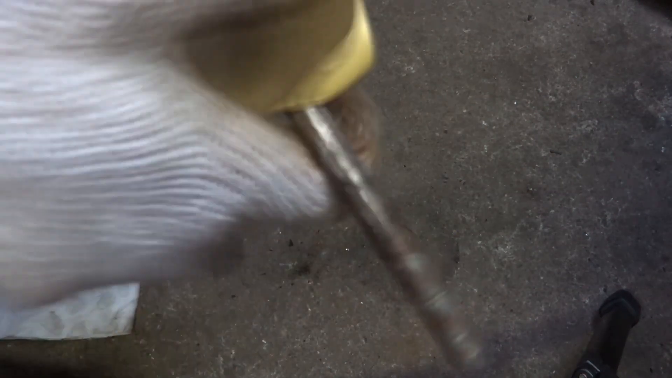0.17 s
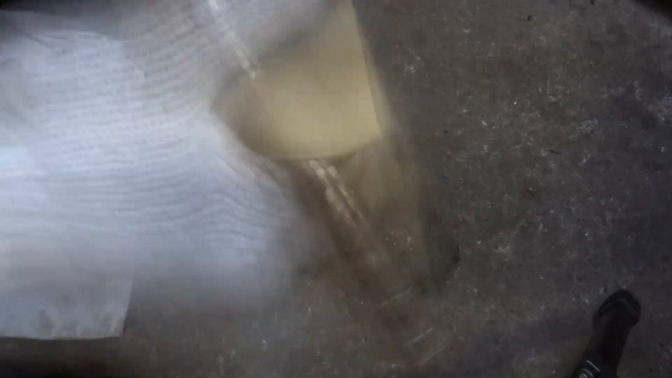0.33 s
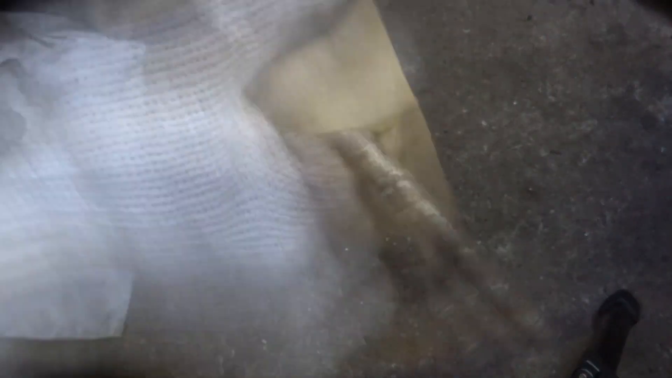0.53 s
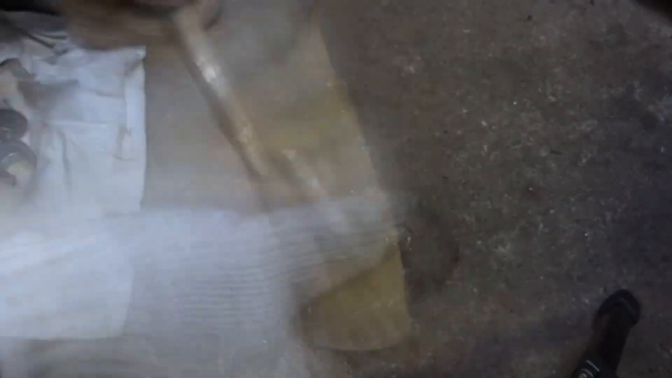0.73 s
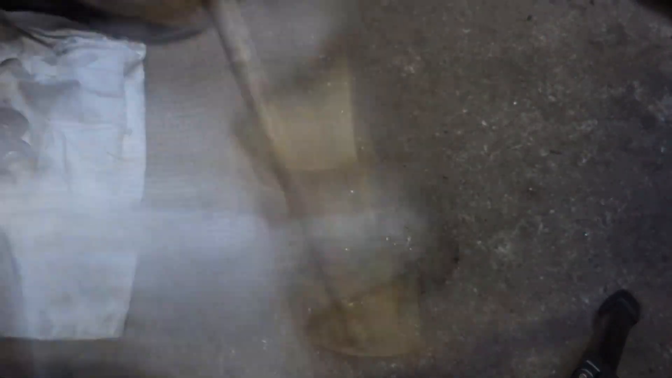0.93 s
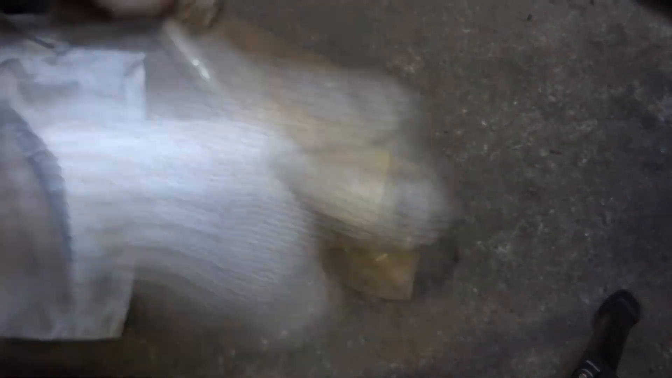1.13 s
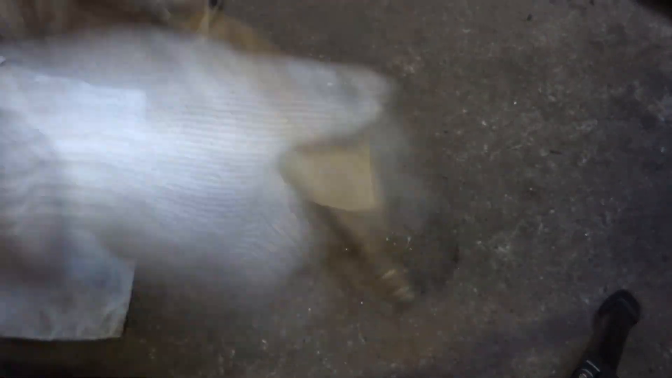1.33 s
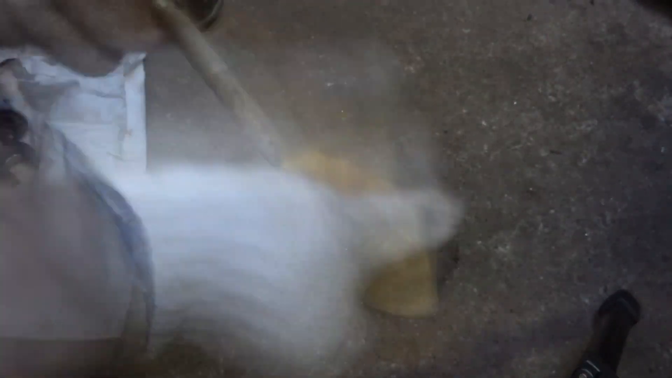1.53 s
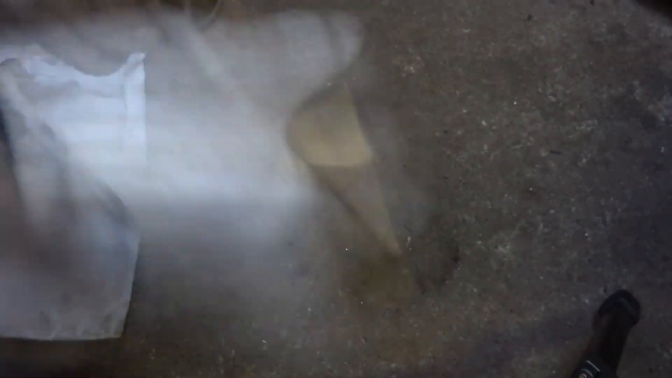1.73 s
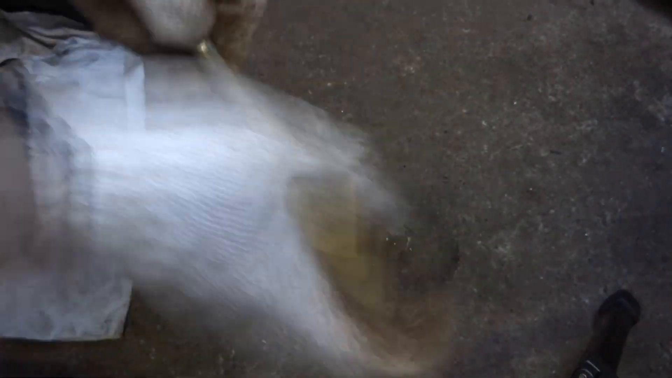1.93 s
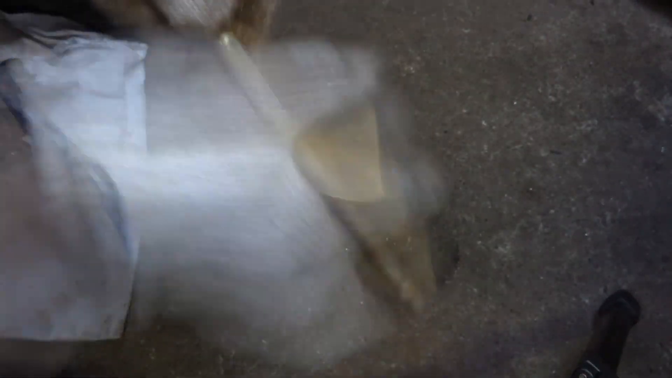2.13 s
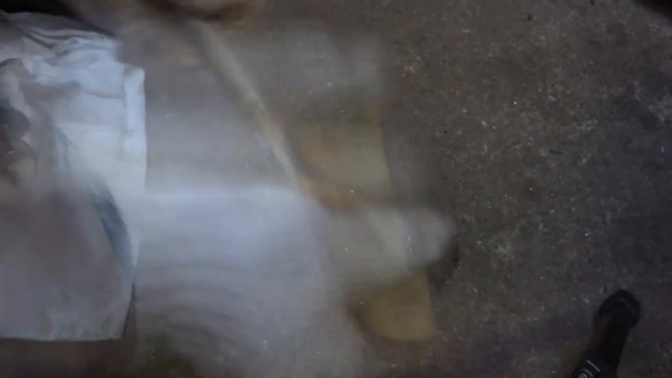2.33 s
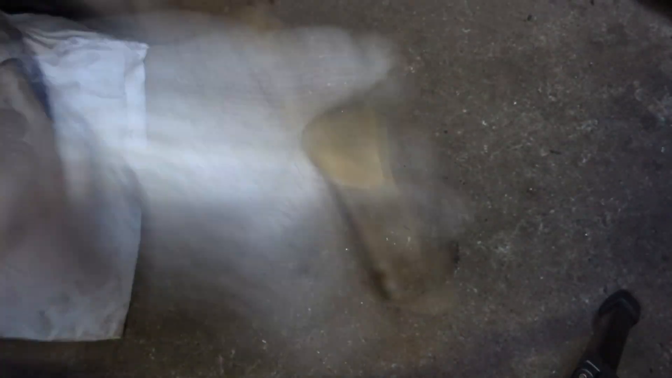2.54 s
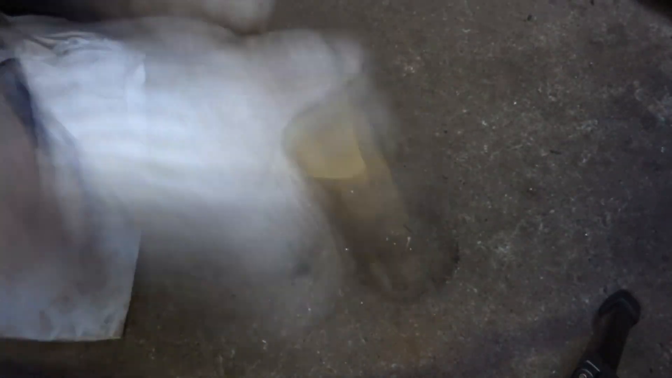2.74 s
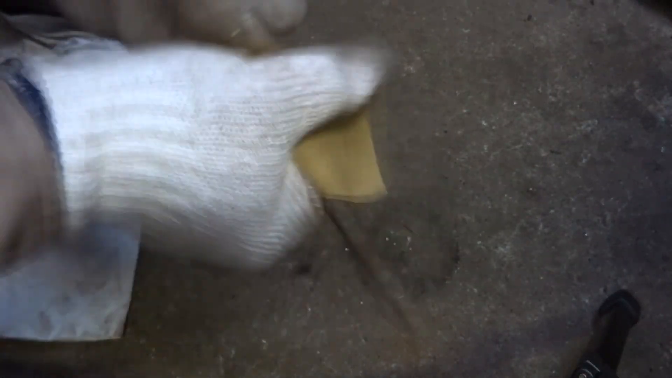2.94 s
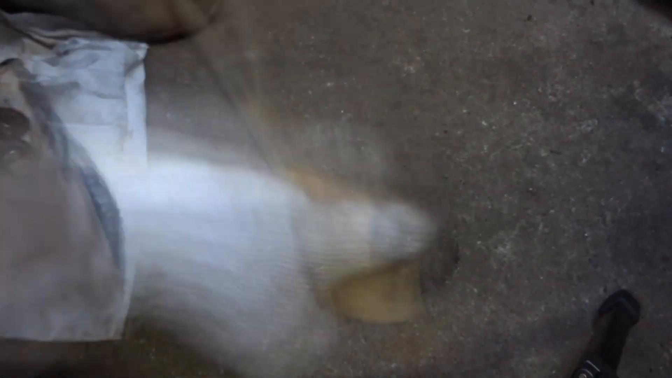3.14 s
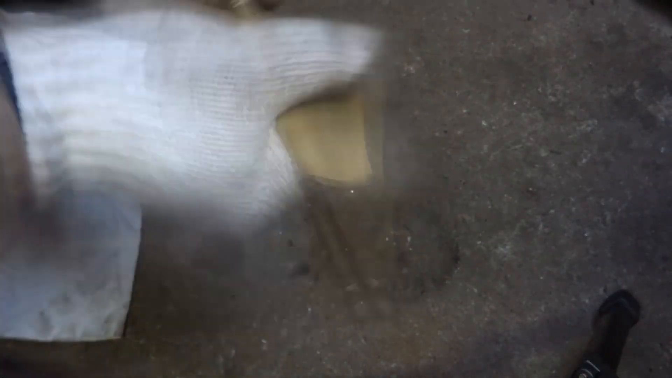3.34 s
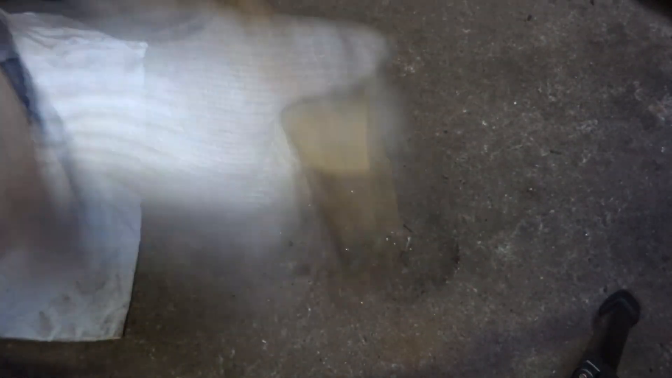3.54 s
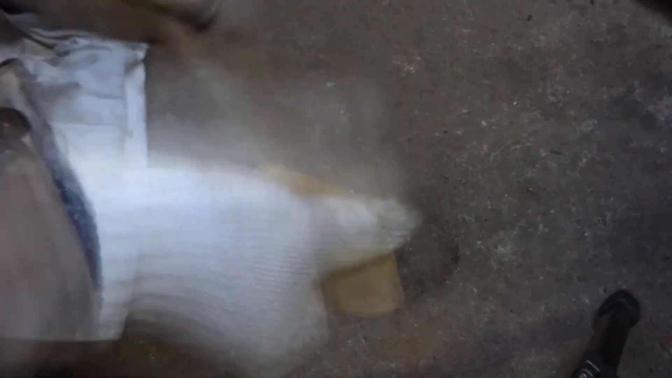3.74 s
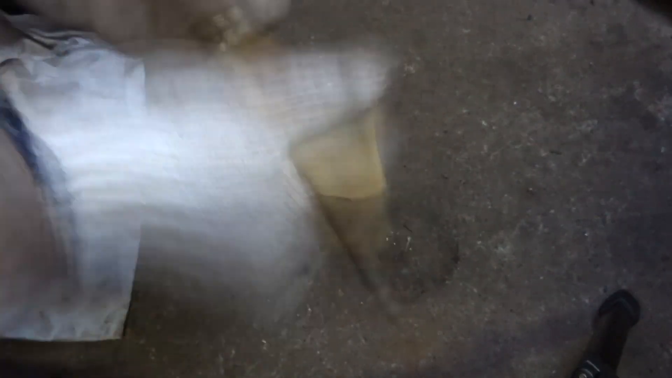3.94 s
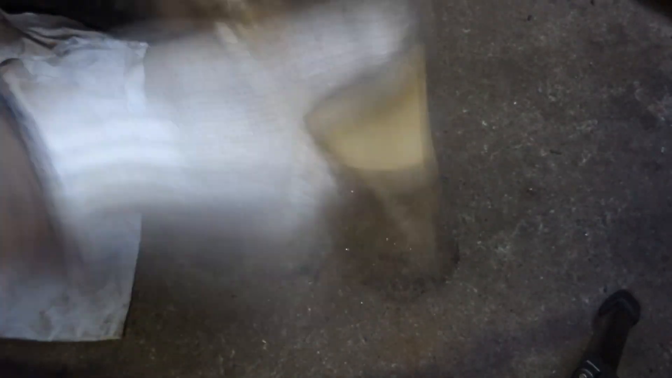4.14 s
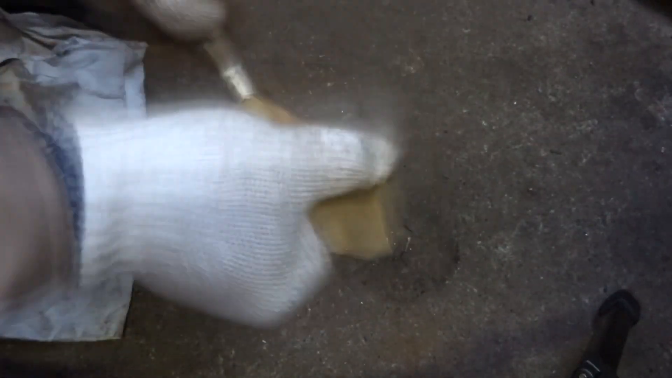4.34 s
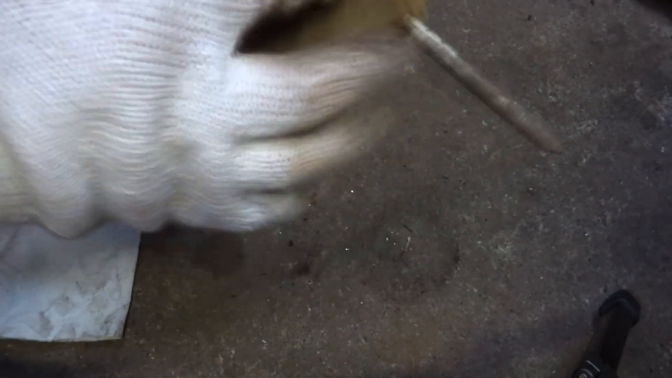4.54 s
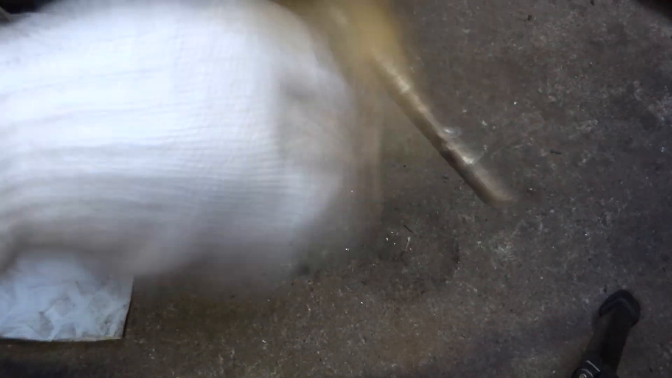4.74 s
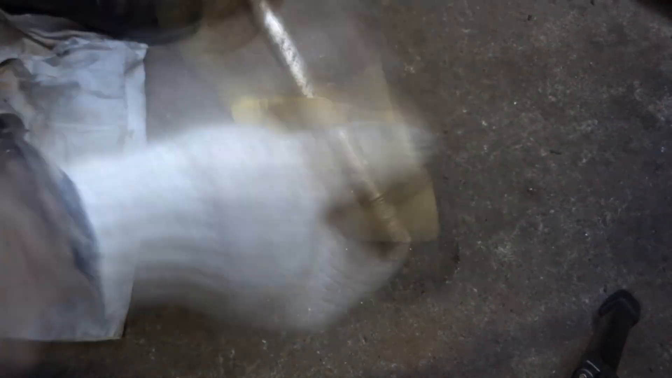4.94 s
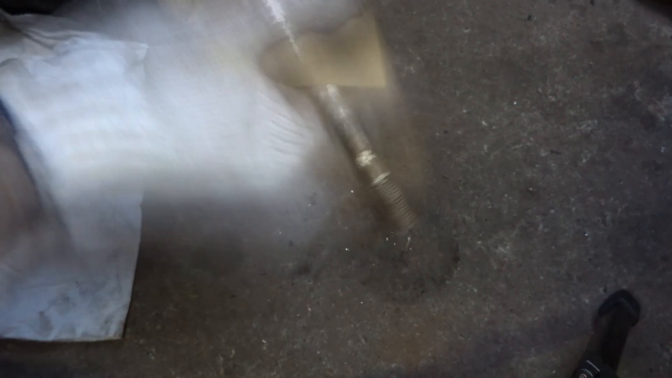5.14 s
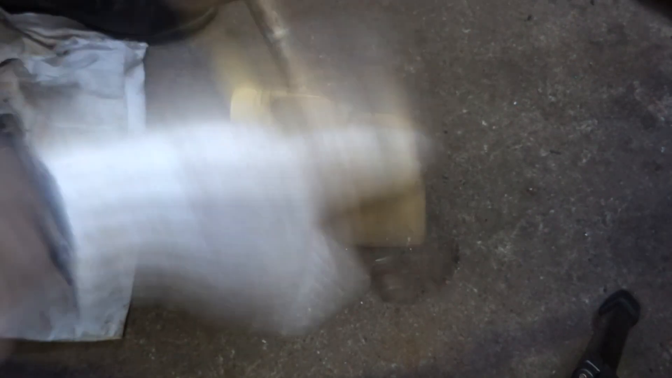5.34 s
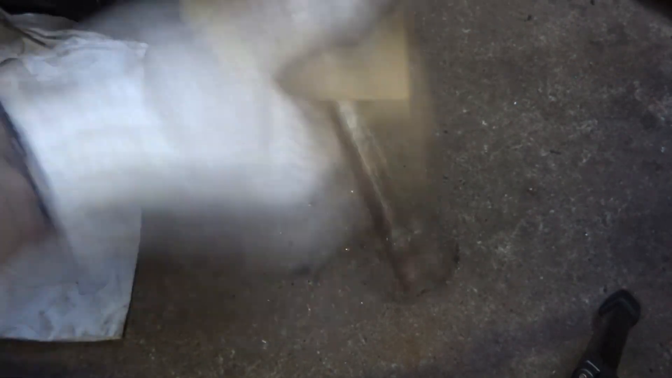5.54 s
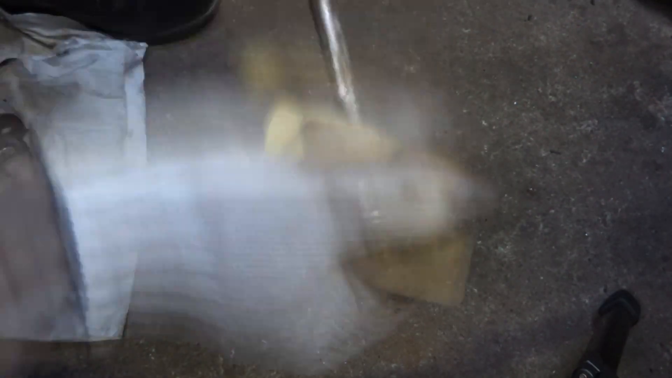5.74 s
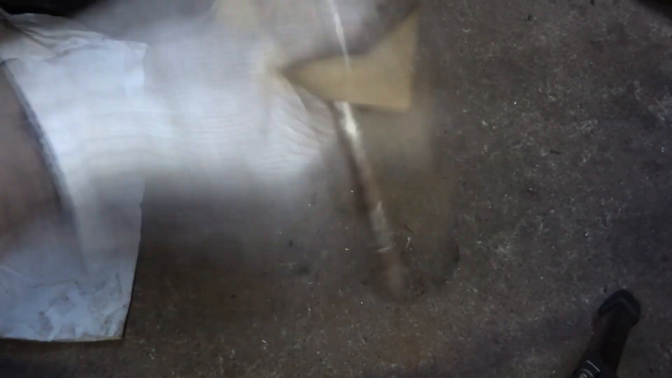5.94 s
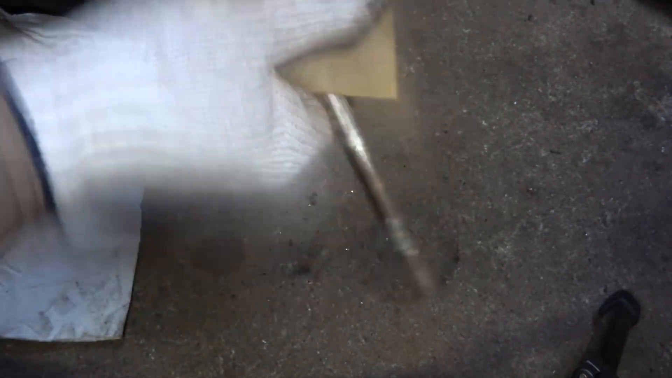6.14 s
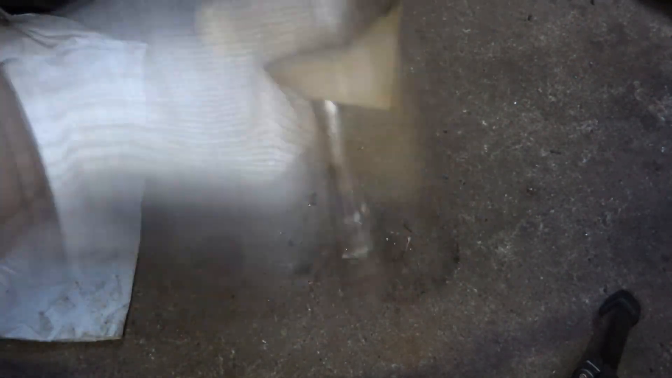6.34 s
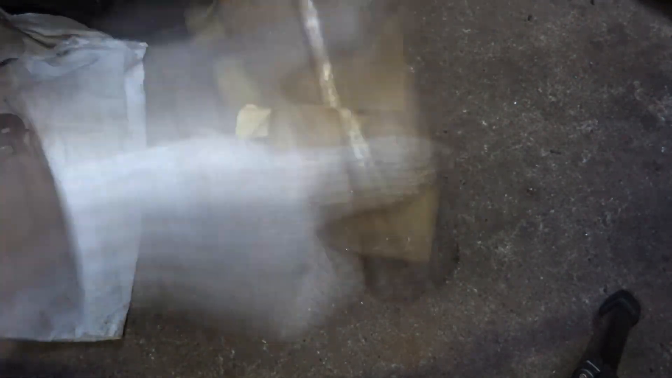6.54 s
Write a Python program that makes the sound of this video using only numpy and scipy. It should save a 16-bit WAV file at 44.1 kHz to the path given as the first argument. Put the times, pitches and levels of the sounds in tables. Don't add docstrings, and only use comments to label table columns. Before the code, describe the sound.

Harsh, hissy, grainy scratching of abrasive paper on corroded metal, recorded at arm's length in a workshop with a hard floor. Each stroke pulses rapidly as the shaft turns. Small dull taps and brief thin rings appear between strokes, the rubbing nearly stops late on, then continues strongly. A quiet drone and unsteady motor tones lie underneath.

```python
import sys
import numpy as np
from scipy import signal
from scipy.fft import rfft, irfft, next_fast_len
from scipy.io import wavfile
from scipy.ndimage import uniform_filter1d, map_coordinates

SR = 44100
rng = np.random.default_rng(int(sys.argv[2]) if len(sys.argv) > 2 else 0)


def to_linear_factor(level_db):
    exponent = np.asarray(level_db, float) / 20
    return 10 ** exponent


def persist_wave(psi):
    counts = np.round(np.clip(psi, -1, 1) * 32767).astype(np.int16)
    wavfile.write(sys.argv[1], SR, np.atleast_2d(counts).T)


N = 290164


def unit(x):
    return x / np.sqrt(np.mean(x ** 2) + 1e-20)


def along(points, hz):
    f, v = np.transpose(points)
    return np.interp(np.log(hz + 1), np.log(f + 1), v)


def curves(rows):
    s, *cols = np.transpose(rows)
    return [np.interp(np.arange(N) / SR, s, c) for c in cols]


def wobble(rate):
    knots = rng.standard_normal(int(N * rate / SR) + 4)
    return map_coordinates(knots, [np.arange(N) * rate / SR])


def filtered(x, response):
    m = next_fast_len(N + 8192)
    hz = np.fft.rfftfreq(m, 1 / SR)
    return irfft(rfft(x, m) * response(hz), m)[..., :N]


def coloured(spectrum):
    return unit(filtered(rng.standard_normal(N), lambda hz: to_linear_factor(along(spectrum, hz))))


def patchy(x, depth_db):
    z = signal.stft(x, nperseg=512)[2]
    field = uniform_filter1d(rng.standard_normal(z.shape), size=3, axis=0)
    field = uniform_filter1d(field, size=14, axis=1)
    return signal.istft(z * to_linear_factor(depth_db * unit(field)), nperseg=512)[1][:N]


def swells(rows):
    t = np.arange(N) / SR
    return sum(to_linear_factor(db) * np.exp(-((t - s) / length) ** 2) for s, db, length in rows)


def tone(hz, drift_hz):
    phase = 2 * np.pi * np.cumsum(hz + drift_hz * wobble(25)) / SR
    return np.sqrt(2) * to_linear_factor(2.8 * wobble(14) - .7) * np.sin(phase)


def shop():
    # (frequency [Hz], level [dB per Hz])
    rumble_colour = [(13, -55), (25, -28), (59, -27), (97, 7), (115, -0.5), (134, 3.5), (199, -5),
                     (260, -2), (340, -23), (570, -120)]
    drone_colour = [(150, -23.5), (260, -15.5), (310, -3), (440, -0.5), (560, -4.5), (1010, -6.5),
                    (1980, -15), (4210, -21.5), (5630, -11), (7550, -17), (9770, -8.5), (15800, -43)]
    aside_colour = [(120, -62), (200, -35), (510, -18), (704, -13), (814, -2.5), (992, -14), (1230, -10.5),
                    (2400, -16.5), (3120, -28), (5280, -120)]
    # (time [s], level [dB], length [s])
    loads = [
        (.15, -65, .07),
        (.7, -77, 0.12),
        (2.169, -70, .12),
        (2.5, -72, .05),
        (4.75, -77, .15),
        (2.87, -69, 0.13),
        (3.48, -62, 0.099),
        (4.177, -69, 0.12),
        (5.52, -75, .06),
    ]
    # (time [s], level [dB], length [s])
    rustles = [
        (.03, -52, 0.06),
        (.25, -53, 0.059),
        (.5, -63, .05),
        (2.9, -56, 0.11),
        (3.45, -60, 0.2),
        (4.5, -59, 0.091),
        (4.75, -57, 0.19),
        (5.32, -55, 0.058),
    ]
    # (time [s], upper level [dB], lower level [dB])
    motor_levels = [(.3, -70, -63), (0.36, -50.5, -59), (0.64, -53, -59.5), (2.38, -63, -58),
                    (3.94, -62, -83), (5.15, -67, -72), (5.33, -65, -60.5), (6.58, -78, -61.5)]
    # (upper [Hz], lower [Hz], lowest [Hz])
    motor_hz = (552, 519, 440)
    rumble = to_linear_factor(-77) + swells(loads)
    fade_db = 0.25 * np.arange(N) / SR
    drone = to_linear_factor(-56 - fade_db) + swells(rustles)
    upper_db, lower_db = curves(motor_levels)
    hum = to_linear_factor(upper_db - 1.3) * tone(motor_hz[0], drift_hz=8)
    hum = hum + to_linear_factor(lower_db - 1.5) * tone(motor_hz[1], drift_hz=7)
    hum = hum + to_linear_factor(-67) * tone(motor_hz[2], drift_hz=12.1)
    mid = rumble * to_linear_factor(1.8 * wobble(9)) * coloured(rumble_colour)
    mid = mid + drone * patchy(coloured(drone_colour), depth_db=1.0)
    side = to_linear_factor(-56.5) * coloured(aside_colour) + rumble * to_linear_factor(-28) * coloured(rumble_colour)
    return mid + side * np.array([[1.3], [-.7]]) + hum * to_linear_factor([[1.5], [-1.5]])


def slips():
    # (time [s], level [dB], length [s])
    skims = [
        (.006, -44, .003),
        (.545, -54, .004),
        (4.535, -33, 0.013),
        (4.583, -39, .003),
        (4.598, -43, .003),
    ]
    return swells(skims) * coloured([(6000, -60), (9500, -11), (12500, 2), (15500, -9)])


def contact():
    # (grip [s], release [s], scratch at grip [dB], scratch at release [dB], brightness [dB])
    strokes = [(0.052, 0.166, -33.5, -38.5, 4), (0.265, 0.438, -33.5, -37.5, 3),
               (0.5, 0.522, -35.5, -35, -0.5), (0.573, 0.624, -35.5, -34.5, 1.5),
               (0.703, 1.13, -36.5, -34, 1.5), (1.126, 1.503, -31.5, -33.5, -2),
               (1.509, 1.822, -32, -33.5, -0.5), (1.82, 1.85, -36, -32, -4), (2.016, 2.456, -36, -34.5, 2),
               (2.535, 2.978, -35, -37, 1.5), (3.083, 3.39, -36, -36, 0.9),
               (3.462, 3.705, -35.5, -35.5, 0.8), (3.722, 3.996, -36, -36.5, -0.5),
               (4.07, 4.364, -35, -34.5, 0), (4.845, 5.235, -33.5, -33.5, 2.5),
               (5.356, 5.704, -34, -34, 2.2), (5.697, 6.112, -33.5, -33, 1.1), (6.19, 6.6, -33, -32.5, 1)]
    brushes = [(0, 0.04, -51, -49, -5), (1.86, 1.94, -50, -65, 3), (4.787, 4.81, -45, -55, 3),
               (4.823, 4.83, -42.5, -36, 8.5), (0.16, .25, -42.5, -49.5, 2), (.44, 0.476, -47, -43.5, 0),
               (.635, 0.66, -41.5, -48, 7), (1.953, 1.999, -43, -40, -4), (2.476, 2.489, -54, -48, 4),
               (2.974, 2.991, -37, -49, -4), (3.048, 3.075, -54, -42, -2), (3.389, 3.402, -39, -43, -5),
               (4.377, 4.385, -34.5, -46, -1), (4.436, 4.443, -41.5, -43, -1),
               (4.45, 4.52, -47, -46.5, -0.5), (4.52, 4.557, -46, -48.5, -3),
               (4.572, 4.591, -48, -46.5, -2), (4.637, 4.652, -39, -45, 3), (4.69, 4.74, -57, -48, -7),
               (4.75, 4.776, -40.5, -36, 2.5), (5.247, 5.29, -41.5, -47, 5.5),
               (5.293, 5.338, -46, -36.5, 1)]
    grip_db_per_s, release_db_per_s, resting_db = 1000, 1248, -57
    t = np.arange(0, 7, .001)
    rows = np.vstack([strokes, brushes])
    held = []
    for a, b, grip_db, release_db, _ in rows:
        closing_db = grip_db_per_s * np.maximum(a - t, 0)
        opening_db = release_db_per_s * np.maximum(t - b, 0)
        held.append(np.interp(t, [a, b], [grip_db, release_db]) - closing_db - opening_db)
    held = np.array(held)
    bright_db = uniform_filter1d(rows[held.argmax(axis=0), -1], size=25)
    return curves(np.transpose([t, np.maximum(held.max(axis=0), resting_db), bright_db]))


def spin():
    # (first bite [s], speed [turns per s], bite depth [dB])
    speeds = [(.068, 27.8, 2.1), (.28, 33.3, 2.6), (.508, 26.3, 2), (.719, 34.6, 1.7), (1.093, 35.9, 1.6),
              (1.485, 34, 1.8), (1.984, 34.8, 1.9), (2.547, 33, 2.4), (2.765, 31, 2.4), (3.097, 32.5, 1.9),
              (3.47, 32.3, 2.1), (3.772, 26.7, 2.3), (4.084, 35.2, 1.8), (4.442, 32.6, 1.2),
              (4.854, 31.5, 1.5), (5.008, 35, 1.5), (5.366, 33.8, 1.7), (5.627, 35.3, 1.6),
              (5.885, 32.9, 1.9), (6.206, 31.7, 1.7)]
    t, rows = np.arange(N) / SR, np.array(speeds)
    current = np.maximum(np.searchsorted(rows[:, 0] - .015, t) - 1, 0)
    first_s, speed, depth_db = rows[current].T
    return speed * (t - first_s), depth_db


def grit(spiky_db, big_share, big_db):
    size = to_linear_factor(spiky_db * rng.standard_normal(N) + big_db * (rng.random(N) < big_share))
    return size * rng.standard_normal(N)


def sanding():
    # (frequency [Hz], level [dB per Hz])
    grit_colour = [(180, -37), (300, -23), (480, -24), (700, -9.5), (1450, -12.5), (2200, -11),
                   (3670, -3.5), (9000, -0.5), (12100, 3.5), (14800, 2), (15900, -4.5)]
    # (time [s], delay [ms], strength [0-1])
    floor_echo = [(0, .8, .3), (.3, .9, .3), (.7, .8, .16), (1.0, .83, .14), (1.12, .95, .42),
                  (1.9, .98, .42), (2.05, 1.06, .22), (2.45, 1.04, .22), (2.55, 1.01, .3), (3.0, 1.02, .3),
                  (3.1, 1.1, .03), (3.8, 1.24, .12), (4.4, 1.27, .1), (4.85, 1.09, .22), (5.2, 1.1, .2),
                  (5.3, 1.17, .14), (6.58, 1.16, .2)]
    # (time [s], looseness [dB])
    looseness = [(0, 0.5), (.3, 2), (.8, 1), (1.2, -0.1), (1.9, -0.9), (1.965, 4.5), (2.04, -1.1),
                 (2.45, -1), (2.95, 1), (3.4, 0.6), (3.6, -0.6), (4.1, 1.2), (4.5, 1), (4.87, 1),
                 (5.25, 0.7), (5.45, -0.5), (6.1, 0.3), (6.58, .1)]
    # (firm level [dB], then [dB per dB] of pressure, of brightness, of looseness)
    fine_layer = (0.14, 0.32, 0.85, 0)
    rasp_layer = (-6, 0, -0.6, 0.14)
    steel_layer = (-5, -0.31, 0.07, 1.5)
    paper_layer = (-15.5, -0.49, 0.7, 2.23)
    firm_db = -34
    scratch_db, bright_db = contact()
    loose_db, = curves(looseness)

    def layer_db(layer):
        db, press, tilt, shake = layer
        return db + press * (scratch_db - firm_db) + tilt * bright_db + shake * loose_db

    turns, depth_db = spin()
    once_a_turn = np.cos(2 * np.pi * turns) - .2 * np.cos(4 * np.pi * turns)
    bite = 1.15 * depth_db * once_a_turn + .6 * wobble(60) + .5 * wobble(30)
    grains = patchy(grit(spiky_db=2.1, big_share=.002, big_db=5), depth_db=1.15)
    delay_ms, strength = curves(floor_echo)
    late = map_coordinates(grains, [np.arange(N) - delay_ms * SR / 1000])
    echo = filtered(late, lambda hz: .9 / (1 + (hz / 9000) ** 2 + (1100 / (hz + 1)) ** 2))
    grains = grains - np.clip(strength, 0, 1) * echo

    def below(hz, edge):
        return 1 / (1 + (hz / edge) ** 8)

    def part(lo, hi):
        return unit(filtered(grains, lambda hz: to_linear_factor(along(grit_colour, hz)) * (below(hz, hi) - below(hz, lo))))

    fine = to_linear_factor(layer_db(fine_layer) + 1.15 * bite + .9 * wobble(20)) * part(8500, 20000)
    scratch = to_linear_factor(bite) * (to_linear_factor(-1.8) * part(5200, 8500) + to_linear_factor(layer_db(rasp_layer)) * part(3500, 5200))
    steel = to_linear_factor(layer_db(steel_layer) + 0.69 * bite) * part(1640, 3310)
    paper = to_linear_factor(layer_db(paper_layer) + 2 + .5 * bite) * part(50, 1935)
    return to_linear_factor(scratch_db - 1.11) * (fine + scratch + steel + paper)


def ring():
    # (peak [s], level [dB], pitch [Hz], glide [Hz per s], length [s])
    rings = [
        (0.152, -41.5, 2625, -2, .015),
        (.375, -38.5, 2810, 2600, 0.077),
        (1.971, -35.5, 2230, 904, .019),
        (1.838, -39.5, 1995, 4, .015),
        (4.49, -46, 1930, 4, .055),
        (4.74, -47.5, 2020, 596.5, .05),
        (4.866, -36.5, 2200, 1509, 0.0236),
        (4.96, -41, 2250, 0, 0.05),
    ]
    t = np.arange(N) / SR
    bells = [to_linear_factor(db) * np.exp(-((t - s) / length) ** 2) for s, db, _, _, length in rings]
    s, _, hz, glide, length = np.array(rings)[np.argmax(bells, axis=0)].T
    pitch_hz = hz + glide * np.clip(t - s, -2 * length, 2 * length)

    def mode(ratio):
        shake = filtered(rng.standard_normal(N), lambda hz: 1 / (1 + (hz / 140) ** 2))
        return unit(shake * np.sin(2 * np.pi * np.cumsum(ratio * pitch_hz) / SR))

    return sum(bells) * (mode(1) + to_linear_factor(-4) * mode(1.68))


def knocks():
    # (time [s], peak [dB], thump [Hz], tick re peak [dB], t60 [s])
    taps = [(0.218, -38.5, 627, -6, 0.14), (0.389, -31, 600, -10, 0.0057), (1.519, -43, 630, -6, 0.045),
            (1.958, -34.5, 1210, -1, 0.048), (2.638, -37, 895, -2, 0.013), (3.317, -29, 550, -14, 0.011),
            (3.66, -36, 680, -3, 0.075), (4.52, -42, 620, 0, 0.063), (4.633, -36, 980, -2, 0.0096),
            (4.72, -45, 420, 15, .012), (4.805, -42.5, 869, 21.5, .01), (4.863, -30.5, 1087, 9, 0.062),
            (5.30, -34.5, 613, -12, .05), (5.332, -33, 640, -6, 0.053), (6.401, -33, 998, -13, 0.087)]
    out, t = np.zeros(N + SR), np.arange(2500) / SR
    for s, db, hz, tick_db, t60 in taps:
        thump = np.sin(2 * np.pi * hz * t) + .5 * np.sin(2 * np.pi * 1.6 * hz * t)
        thump = to_linear_factor(-60 * t / t60) * thump
        tick = to_linear_factor(tick_db - 60 * t / .006) * np.sin(2 * np.pi * rng.uniform(2200, 2900) * t)
        crack = to_linear_factor(1.5) * np.exp(-((t - .0003) / .00013) ** 2)
        out[round(s * SR):][:len(t)] += to_linear_factor(db) * (thump + tick + crack)
    return filtered(out[:N], lambda hz: 1 / (1 + (330 / (hz + 1)) ** 6))


def scene():
    # (frequency [Hz], side re mid [dB])
    spread = [(1500, -35), (3000, -22), (5000, -19), (9000, -19), (13000, -21.5)]
    near = sanding() + ring() + slips()
    side = filtered(np.roll(near, 300), lambda hz: to_linear_factor(along(spread, hz)))
    return near + knocks() + side * np.array([[1], [-1]]) + shop()


def housing(hz):
    # (centre [Hz], width [Hz], gain [dB])
    bumps = [(235, 60, -4), (690, 170, -10), (1460, 120, 2.5), (1670, 120, -9), (2230, 200, 1.2),
             (2950, 130, -4), (3740, 220, 1.2), (4250, 200, -1.5)]
    return to_linear_factor(sum(db / (1 + (2 * (hz - c) / w) ** 2) for c, w, db in bumps))


def roll_off(x):
    return signal.sosfilt(signal.butter(12, 16710, fs=SR, output="sos"), x)


def record(dry):
    top_hz = 15965
    heard = filtered(dry, lambda hz: housing(hz) * (hz < top_hz) / (1 + (35 / (hz + 1)) ** 2))
    return roll_off(heard)


dry = scene()
out = record(dry)
persist_wave(out)
```